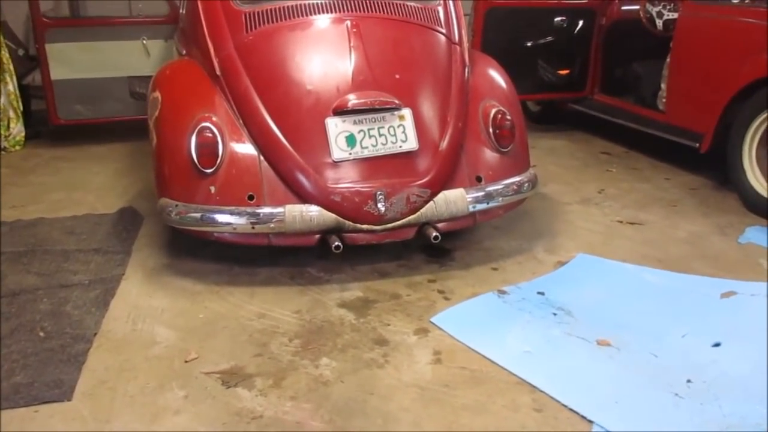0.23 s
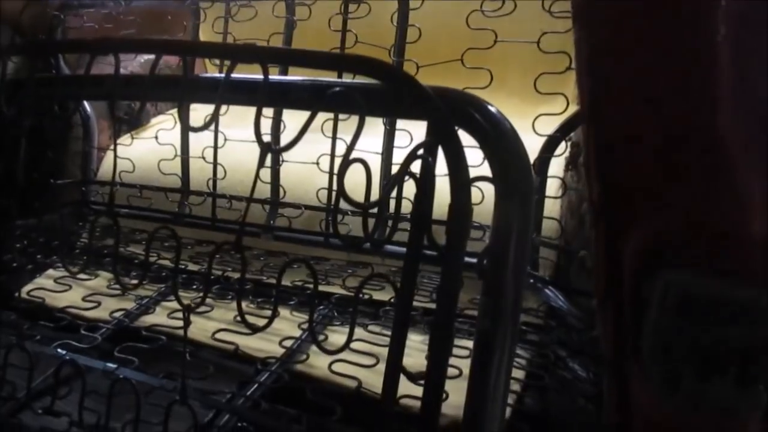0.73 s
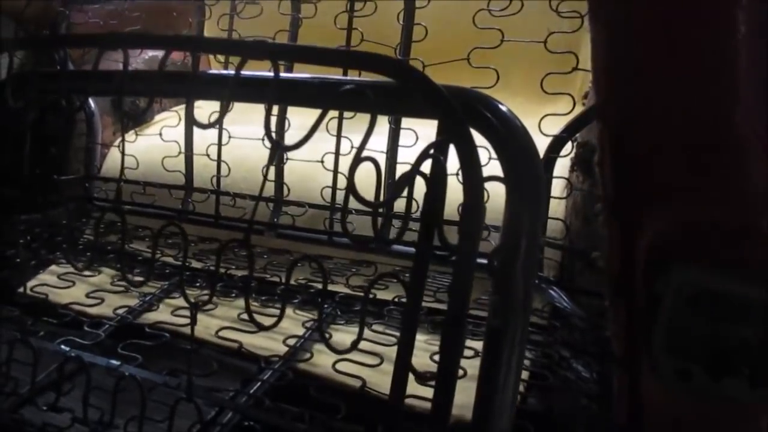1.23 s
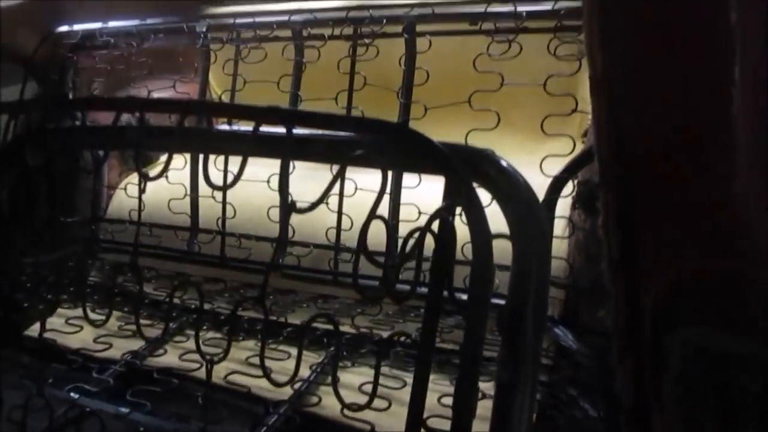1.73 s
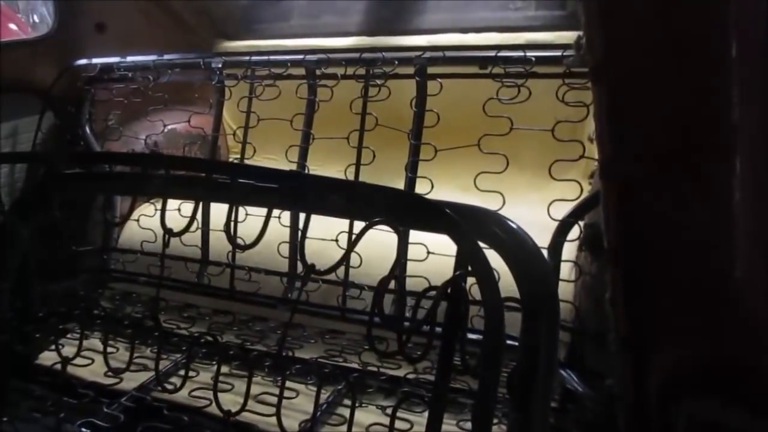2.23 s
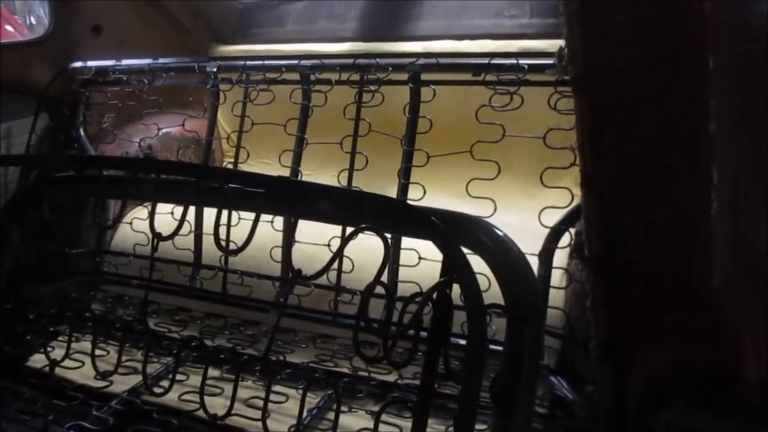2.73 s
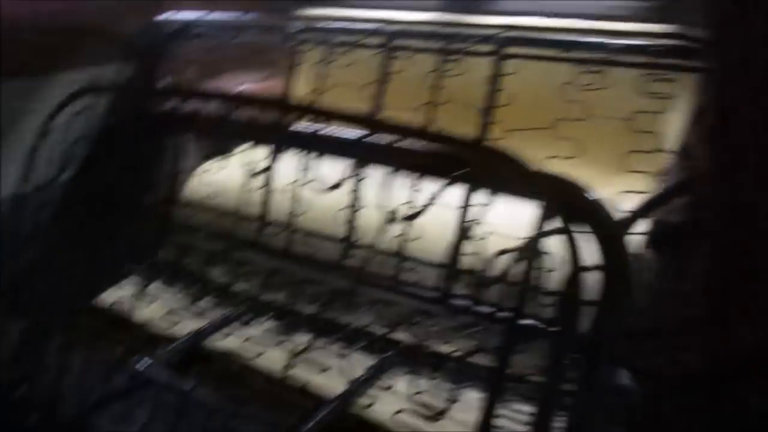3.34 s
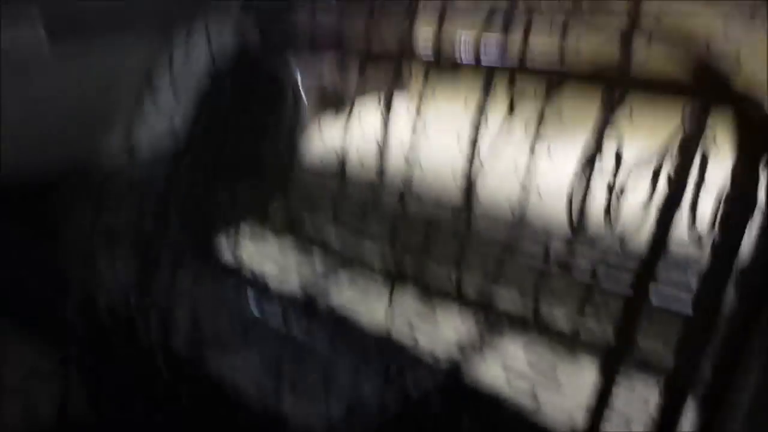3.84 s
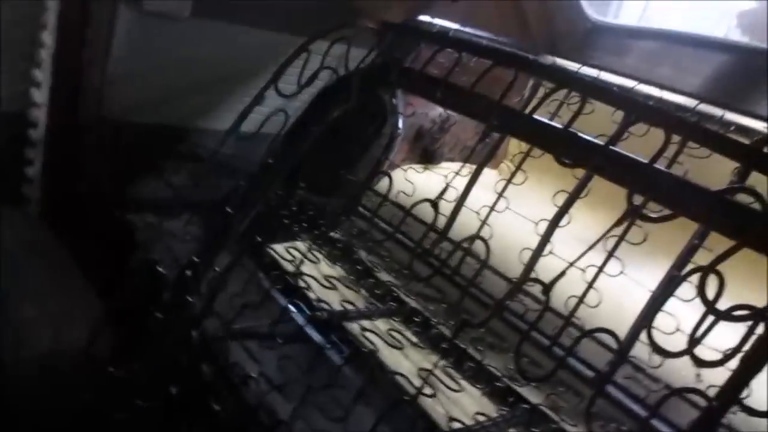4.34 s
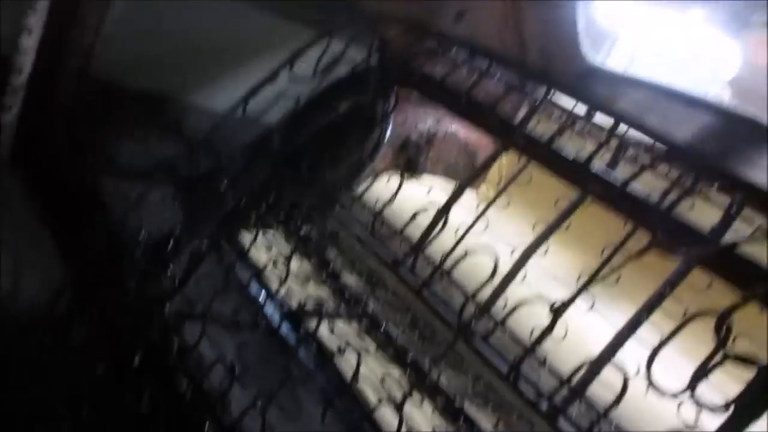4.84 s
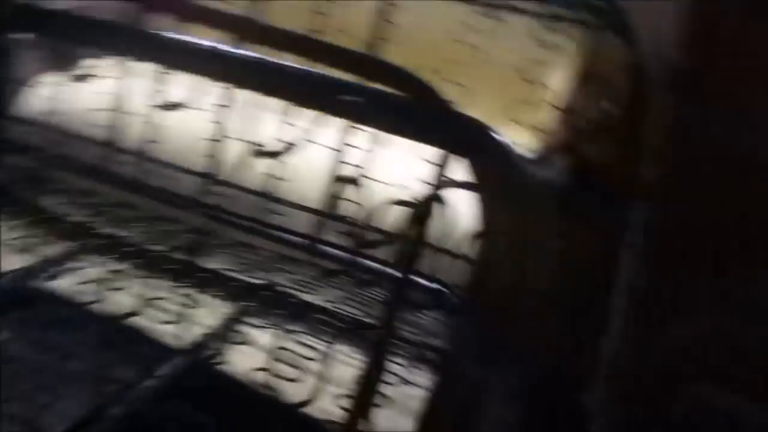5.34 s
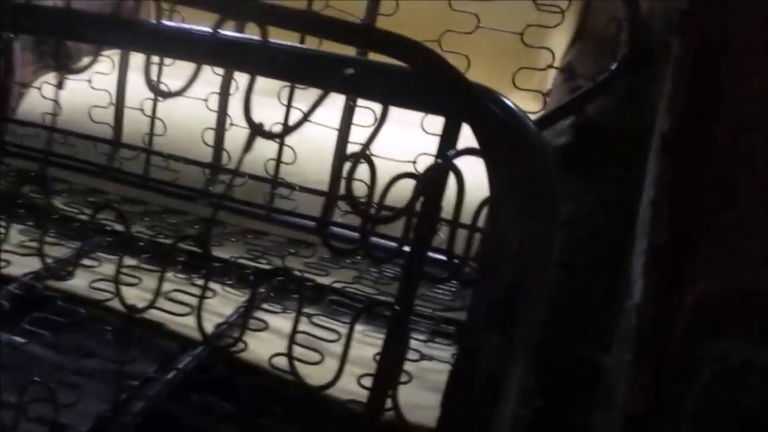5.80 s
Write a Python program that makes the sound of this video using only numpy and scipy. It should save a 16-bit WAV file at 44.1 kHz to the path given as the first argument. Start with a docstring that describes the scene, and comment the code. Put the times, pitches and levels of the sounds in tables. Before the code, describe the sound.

An air-cooled four-cylinder engine idles unevenly with fan rush, heard inside a bare car, then loses ignition and chugs down amid handling bumps.

```python
"""An air-cooled flat-four idles in a garage: a moment behind the tailpipes, silence, then inside the bare cabin.
Four uneven cylinders drone in tuned harmonics and rasp in echoed pulses, under a cooling fan of shaped noise.
The ignition goes off; gliding harmonics pump air and short resonances shudder as the engine runs down.
The hand that holds the microphone clicks and rustles in noise bursts, over a faint hiss and whine."""
import sys
import numpy as np
from scipy import signal
from scipy.fft import rfft, irfft, next_fast_len
from scipy.io import wavfile
from scipy.ndimage import uniform_filter1d

SR = 44100
rng = np.random.default_rng(int(sys.argv[2]) if len(sys.argv) > 2 else 0)


def to_wav(sig):
    """Store sig (one row per channel, or 1-D mono) as 16-bit WAV at the path in sys.argv[1].

    Samples outside -1..1 are clipped; the rate is SR.
    """
    pcm = np.clip(np.atleast_2d(sig), -1, 1) * 32767
    pcm = np.round(pcm).astype(np.int16)
    wavfile.write(sys.argv[1], SR, pcm.T)  # frames by channels


N = 267642
T = np.arange(N) / SR

# reference firing rate at idle (firings per second, four to a cycle)
IDLE_HZ = 49.955
# The four cylinders in firing order. Each row: strength in dB, lateness in firing intervals.
CYLINDERS = [(-3, -0.0016), (0, 0.0256), (-1, 0.0798), (-1, -0.0517)]


def undb(db):
    """Decibels to gain."""
    return 10 ** (np.asarray(db) / 20)


def curve(rows):
    """Join rows of (seconds, value) by straight lines in time."""
    return np.interp(T, *np.transpose(rows))


def unit(x):
    """Scale to rms 1."""
    return x / np.sqrt(np.mean(x ** 2))


def steady(x, size=11000):
    """Even out the level to about rms 1 over every quarter second."""
    local_power = uniform_filter1d(x ** 2, size)
    return x / np.sqrt(local_power + 1e-4 * np.mean(x ** 2))


def walk(rate):
    """Smooth random wander of rms 1, from noise steps at the given rate in Hz."""
    k = int(SR / rate)
    steps = np.repeat(rng.standard_normal(4096), k)[:N]
    return unit(uniform_filter1d(uniform_filter1d(steps, k), k))


def colour(x, points):
    """Shape a sound with a spectrum of (Hz, dB) points; it falls off below the first."""
    hz, db = np.transpose(points)
    size = next_fast_len(N + 8192)
    f = np.maximum(np.fft.rfftfreq(size, 1 / SR), 1)
    gain = undb(np.interp(np.log(f), np.log(hz), db)) * np.minimum(f / hz[0], 1) ** 2
    return irfft(rfft(x, size) * gain, size)[:N]


def ring(x, modes):
    """Send a sound through parallel resonances of (Hz, width in Hz, dB)."""
    out = 0
    for hz, width, db in modes:
        b, a = signal.iirpeak(hz, hz / width, fs=SR)
        out = out + undb(db) * signal.lfilter(b, a, x)
    return out


def echoes(x, tail_s):
    """Dense noise-like reflections that die away."""
    t = T[:SR // 3]
    return signal.fftconvolve(x, rng.standard_normal(len(t)) * np.exp(-t / tail_s))[:N]


def strokes(events, modes, contact_s=0.00045):
    """Single sharp blows of (seconds, peak dB) into a set of resonances, passed twice."""
    size = 2048
    out = np.zeros(N + size)
    for s, db in events:
        push = np.exp(-T[:size] / contact_s) * rng.standard_normal(size)
        blow = ring(ring(push, modes), modes)
        at = int(np.clip(s * SR, 0, N))
        out[at:at + size] += undb(db) * blow / np.abs(blow).max()
    return out[:N]


def throb(since_s, hz, half_s, lag=0):
    """A resonance that swells and fades within a few waves."""
    return np.exp(-.5 * (since_s / half_s) ** 2) * np.cos(2 * np.pi * hz * since_s + lag)


def drone(phase, orders, lead, trail=.34, waver_db=0.97, lope=0.12):
    """Exhaust tones: multiples of four come from even firing, the rest from unevenness between cylinders."""
    # the upper resonance: each throb differs in strength (share) and lag (radians)
    strength_spread, lag_spread = .09, .2
    # its throb is drawn out: lag in radians grows away from a centre (multiple of the cycle rate)
    smear, centre = .075, 21.7
    low, high = 0, 0
    swell = 1 + lope * walk(21.77)
    for k, db in orders:
        upper = k > 16
        angle = np.pi / 2 * k * (phase + lead)
        if k % 4 == 0:
            tone = -undb(db + waver_db * walk(10)) * np.exp(1j * angle)
        else:
            # the uneven throb trails the firing; the upper resonance turns it a quarter wave
            tone = undb(db) * swell * np.exp(1j * (angle - np.pi / 2 * (k * trail - upper)))
        if upper:
            high = high + tone * np.exp(1j * smear * (k - centre) ** 2)
        else:
            low = low + tone
    uneven = (1 + strength_spread * walk(30)) * np.exp(1j * lag_spread * walk(25))
    return unit(np.real(low + high * uneven))


def firings(phase, scatter_db=1.5, jitter_s=0.00018):
    """One pulse train per cylinder; every firing has its own strength and timing."""
    number = np.arange(1, int(phase[-1]))
    chance = rng.standard_normal((400, 2))[number]
    db, late = np.array(CYLINDERS)[number % 4].T
    at = (np.interp(number + late, phase, T) + jitter_s * chance[:, 0]) * SR
    trains = np.zeros((4, N))
    trains[number % 4, np.clip(at.astype(int), 0, N - 1)] = undb(db + scatter_db * chance[:, 1])
    return trains


def rasp(phase, spectrum, pipe_db, tail_s=0.052, gas_db=-4, puff=4.3, pipe_gas_db=-5, swell_db=-0.06):
    """Each cylinder rattles its own path through the silencer, and a puff of gas follows."""
    # Ringing of the tailpipes. Each row: Hz, width in Hz, level in dB.
    pipe_modes = [(667, 10, -8), (692.6, 13, 4.5), (769.7, 16, 9.5), (931, 13, 3), (1072, 3.7, -7),
                  (1141, 3.4, 8)]
    trains = firings(phase)
    clatter = unit(sum(echoes(train, tail_s) for train in trains))
    strength = undb(np.array(CYLINDERS)[phase.astype(int) % 4, 0])
    # the puff dies away in firing intervals
    gas = unit(rng.standard_normal(N) * strength * np.exp(-(phase % 1) / puff))
    flow = clatter + undb(gas_db) * gas
    # one cylinder and the gas set the tailpipes ringing
    pipes = ring(unit(trains[0]) + undb(pipe_gas_db) * gas, pipe_modes)
    pipes = signal.sosfilt(signal.butter(4, 1500, fs=SR, output="sos"), pipes)
    swell = undb(swell_db * np.cos(np.pi / 2 * (phase - .3)))  # once a cycle
    return steady(swell * (unit(colour(flow, spectrum)) + undb(pipe_db) * unit(pipes)))


def barks(phase, rate):
    """Slugs of gas sound the tailpipes at set places in every cycle; the pitches stay as the engine slows."""
    # Each row: place in firing intervals, Hz, half length in seconds, typical peak in dB.
    bark_rows = [(.42, 645, .0028, -32), (.7, 787, .0052, -26), (1.285, 780, .006, -33),
                 (1.52, 1030, .0022, -34), (1.56, 660, .003, -35), (2.55, 430, .0055, -35),
                 (2.91, 775, .009, -32.5), (3.137, 425, .005, -36), (3.62, 680, .0055, -33),
                 (3.72, 1035, .0022, -35)]
    scatter_db, stagger = 2.2, .42  # strength in dB and lag in radians vary from bark to bark
    out = 0
    for place, hz, half_s, db in bark_rows:
        cycle, within = np.divmod(phase - place + 2, 4)
        strength, lag = rng.standard_normal((200, 2))[cycle.astype(int)].T
        since_s = (within - 2) / rate
        out = out + undb(db + scatter_db * strength) * throb(since_s, hz, half_s, stagger * lag)
    return out


def pops():
    """Harder slugs of gas pop in the tailpipes, as short pushes into resonances."""
    # Each row: time in seconds, peak in dB.
    pop_times = [(1.617, -19), (1.733, -23), (2.030, -21), (2.111, -19), (2.932, -17), (2.991, -20),
                 (4.208, -17.5), (5.409, -27)]
    # Ringing of a pop. Each row: Hz, width in Hz for one pass, level in dB.
    pop_modes = [(563, 200, 5), (797, 110, 5.5), (1030, 140, -2.5)]
    return strokes(pop_times, pop_modes)


def fan(phase, spectrum, bright_db, chatter_db=-3.0, chatter_s=0.0022, tin_db=-24, flutter_db=0.74,
        panel_db=-12.5, panel_s=0.0071):
    """Cooling air rushes through the tinware while the valve gear chatters unevenly."""
    # Ringing of the cooling tinware. Each row: Hz, width in Hz for one pass, level in dB.
    tin_modes = [(3266, 220, -4), (3968, 160, -2), (5155, 120, -5), (6140, 350, -6), (8340, 600, -5)]
    # eight small contacts to a firing interval, each with its own force
    contacts = np.diff(np.floor(8 * phase + .3 * walk(300)), prepend=0) > 0
    forces = contacts * undb(2.2 * rng.standard_normal(N))
    ticks = signal.lfilter([1], [1, -np.exp(-1 / (chatter_s * SR))], forces)
    air = rng.standard_normal(N) * undb(flutter_db * walk(24.17))
    drive = air + undb(chatter_db) * unit(ticks * rng.standard_normal(N))
    # nearby panels colour the rush
    drive = unit(drive) + undb(panel_db) * unit(echoes(drive, panel_s))
    tin = unit(ring(ring(drive, tin_modes), tin_modes))
    rush = unit(colour(drive, spectrum)) + undb(tin_db) * tin
    # the top of the rush has its own level
    top = signal.sosfiltfilt(signal.butter(2, 3800, "high", fs=SR, output="sos"), rush)
    return unit(rush + top * (undb(bright_db) - 1))


def pumping(phase, pace, unfired, hum_db=-24.0, rumble_db=-36, shudder_db=-26.0, shudder_power=2.7,
            garage_s=0.11, churn_db=-1, lump_db=2.5):
    """Unfired pistons push air: harmonics glide through the cabin's boom, and the garage rings and rumbles."""
    # Air pulses of the unfired pistons. Each row: multiple of the firing rate, level in dB.
    pulse_orders = [(1, 0), (2, -1.5), (3, -6), (4, -21), (5, -13), (6, -14), (7, -17), (8, -15), (9, -14),
                    (10, -14), (11, -16)]
    # Level of the air pulses during the run-down. Each row: time in seconds, dB.
    pulse_level = [(4.68, 0), (4.76, 3), (4.9, -5), (5.07, -2), (5.14, 0), (5.3, -2), (5.43, -1.5),
                   (5.56, 1), (5.61, -8), (5.76, -7), (5.84, 2), (5.92, -7)]
    # How the cabin passes the air pulses. Each row: Hz, dB.
    boom_hz, boom_gain_db = np.transpose([(18, -17), (30, -11), (36, -14), (40, -5), (43, 0), (51, 0),
                                          (57, -8), (68, -16), (80, -11), (95, -10), (112, -14), (130, -6),
                                          (150, -6), (170, -19), (230, -14), (320, -24)])
    # Standing waves of the garage. Each row: Hz, width in Hz, dB.
    garage_modes = [(139, 4, -3), (152.6, 3, 6), (165, 3.3, 7)]
    # Body shell, silencer and cabin resonances. Each row: Hz, width in Hz, dB.
    body_modes = [(46, 24, 8.5), (88, 260, -3), (138.4, 12, -4), (260, 24, -5.5), (273, 16, -7),
                  (356, 32, -5)]
    hum = 0
    for k, pulse_db in pulse_orders:
        boom_db = np.interp(k * IDLE_HZ * pace, boom_hz, boom_gain_db)
        level = undb(pulse_db + boom_db + lump_db * walk(6.6))
        hum = hum - level * np.cos(2 * np.pi * k * (phase + .5))
    hum = unfired * undb(curve(pulse_level)) * hum
    wash = unit(sum(echoes(train, garage_s) for train in firings(phase)))
    wash = wash + undb(churn_db) * rng.standard_normal(N)
    rumble = colour(ring(wash, body_modes),
                    [(35, -9), (60, -10), (110, 3), (350, -7.0), (700, -7.5), (2000, -20.5)])
    # the body shudders when the firing stops, and settles as the speed falls
    shudder = undb(shudder_db) * unfired * pace ** shudder_power
    return (undb(rumble_db) + shudder) * steady(rumble) + undb(hum_db) * (hum + ring(hum, garage_modes))


def in_cabin(dulling=0.49, lurch=.035, bark_db=-0.3, bark_power=1.0):
    """The drone lasts as long as combustion; rasp and fan sink with engine speed, and the fan grows duller."""
    # The idle hunts a little. Each row: time in seconds, firings per second.
    idle_rate = [(1.1, 49.98), (1.5, 50.26), (2.0, 49.77), (2.35, 49.42), (2.8, 50.42), (3.2, 49.92),
                 (3.62, 49.6), (4.0, 50.33), (4.5, 49.93), (4.65, 49.45)]
    # The engine runs down. Each row: time in seconds, firings per second.
    coast_rate = [(4.72, 47.3), (4.79, 43.5), (4.86, 39), (5.0, 33.5), (5.18, 28), (5.3, 24.7),
                  (5.45, 21.6), (5.55, 19.7), (5.75, 16.4), (5.85, 14.4), (6.07, 10.5)]
    # Exhaust drone. Each row: multiple of the cycle rate, relative level in dB.
    cabin_orders = [(2, -38), (3, -20), (4, -3.4), (5, -31), (6, -26), (7, -23), (8, -12.3), (9, -21.5),
                    (10, -13.8), (11, -23), (12, -1.3), (13, -22), (14, -13.5), (15, -21), (16, -32),
                    (17, -20), (18, -18), (19, -32), (20, -10.5), (21, -15), (22, -6.8), (23, -15),
                    (24, -28), (25, -25), (26, -25), (27, -23), (28, -29), (29, -28)]
    # Spectrum of the exhaust rasp. Each row: Hz, relative dB per Hz.
    rasp_spectrum = [(150, 9), (220, 5.5), (300, 0), (400, 1.5), (590, -3), (700, 1), (900, -1),
                     (1100, -2.5), (1250, -41), (1700, -16), (3000, -46)]
    # Spectrum of the fan. Each row: Hz, relative dB per Hz.
    fan_spectrum = [(900, -10), (1250, -9.5), (1600, -13.5), (2400, -15.5), (3000, -17.5), (4200, -22),
                    (5400, -24.5), (7000, -25.5), (8500, -26.5), (11500, -32), (13500, -43), (15500, -64)]
    # Treble of the fan, before dulling. Each row: time in seconds, dB.
    treble = [(.6, -1), (1.6, -0.1), (2.5, 0), (3.2, -1), (3.6, -0.5), (4.3, -2.5), (4.8, -3.5)]
    # The mechanical wash swells unevenly. Each row: time in seconds, dB.
    wash_level = [(.6, 1), (1.45, -0.5), (1.7, -0.5), (1.85, 0), (2.0, 0.5), (2.5, -.5), (2.82, 0.8),
                  (3.2, 0.4), (3.5, -1.1), (3.9, 0.5), (4.1, 1.6), (4.5, 0.3), (4.9, 0), (5.6, -1)]
    # Exhaust rasp and fan as the microphone moves about the cabin. Each row: time in seconds, dB.
    nearness = [(.6, 0), (3.25, 1), (3.45, 0.4), (3.8, -1.1), (4.1, -1.3), (4.65, -0.3)]
    drone_db, rasp_db, fan_db = -20, -29, -38.5  # base levels at idle
    rasp_power, fan_power = 1, 1.08  # how strongly each follows the engine speed
    ignition_off_s, burn_fade_db_per_s = 4.66, 59  # the last combustions die away

    burn = undb(-burn_fade_db_per_s * np.maximum(T - ignition_off_s, 0))
    rate = curve(idle_rate + coast_rate)
    pace = rate / IDLE_HZ
    phase = np.cumsum(rate) / SR + 2.13  # in firing intervals
    # as it slows the crank lurches from one compression to the next
    phase = phase + lurch * (1 - pace) * walk(12)
    tones = undb(drone_db) * burn * drone(phase, cabin_orders, lead=.5, trail=.34)
    exhaust = undb(rasp_db) * pace ** rasp_power * rasp(phase, rasp_spectrum, pipe_db=-9.5)
    exhaust = exhaust + undb(bark_db) * pace ** bark_power * barks(phase, rate)
    bright_db = curve(treble) + dulling * 20 * np.log10(pace)
    cooling = undb(fan_db + curve(wash_level)) * pace ** fan_power * fan(phase, fan_spectrum, bright_db)
    near = undb(curve(nearness)) * (exhaust + cooling)
    return tones + pumping(phase, pace, 1 - burn) + near + pops()


def behind_car(drone_db=-23.0, rasp_db=-33, fan_db=-35):
    """Close to the tailpipes the idle is brighter and less boomy."""
    # Exhaust drone. Each row: multiple of the cycle rate, relative level in dB.
    rear_orders = [(4, -9), (6, -5), (8, -1), (10, -3), (12, 0), (14, -1), (16, -9), (18, -5), (20, -4),
                   (22, -3), (23, -9), (28, -13)]
    # Spectrum of the exhaust rasp. Each row: Hz, relative dB per Hz.
    rasp_spectrum = [(150, 3), (280, 7), (380, -4), (500, 1.5), (620, 3), (730, -1.5), (860, -9),
                     (1100, -2), (1250, -18.5), (1700, -26.5), (3000, -33.5)]
    # Spectrum of the fan. Each row: Hz, relative dB per Hz.
    fan_spectrum = [(900, 2.5), (1400, -10), (3000, -11.5), (5200, -18.5), (7900, -14.5), (10000, -18.5),
                    (12000, -26), (15500, -44.5)]
    phase = 48.0 * T + 3.4  # 48 firings per second
    tones = undb(drone_db) * drone(phase, rear_orders, lead=0, trail=.5)
    exhaust = tones + undb(rasp_db) * rasp(phase, rasp_spectrum, pipe_db=-25.0)
    return exhaust + undb(fan_db) * fan(phase, fan_spectrum, bright_db=0.0)


def shudders():
    """The slowing engine rocks on its mounts and sets the body booming."""
    # Each row: time in seconds, Hz, half length in seconds, peak in dB.
    shudder_rows = [(4.77, 138, 0.016, -22.5), (4.86, 133, 0.019, -26), (5.066, 136, 0.021, -24),
                    (5.122, 145, 0.012, -24), (5.195, 148, .014, -27), (5.281, 134, .018, -29),
                    (5.475, 129, 0.016, -29), (5.634, 140, .013, -27), (5.786, 135, .018, -33.5),
                    (5.895, 161, .02, -29), (6.04, 130, 0.02, -32.5)]
    out = 0
    for s, hz, half_s, db in shudder_rows:
        out = out + undb(db) * throb(T - s, hz, half_s, rng.uniform(0, 2 * np.pi))
    return out


def noise_bursts(events, spectrum, grain_db=0):
    """Short bursts of contact noise that swell and die away; rubbing catches in small grains."""
    envelope = 0
    for s, db, rise, decay in events:
        envelope = envelope + undb(db) * np.exp(-np.maximum((s - T) / rise, (T - s) / decay))
    grains = rng.standard_normal(N) * undb(grain_db * walk(600))
    return envelope * unit(colour(grains, spectrum))


def rattles():
    """The tinware rattles now and then, as grainy bursts of noise."""
    # Each row: time in seconds, level in dB, rise in seconds, decay in seconds.
    rattle_times = [(1.69, -44, .04, .035), (1.975, -43, .03, 0.028), (2.81, -44, .04, .04),
                    (4.09, -45.5, 0.044, .05)]
    # Each row: Hz, relative dB per Hz.
    rattle_spectrum = [(1200, -6), (1900, -7), (3300, 0), (6000, -10), (12000, -30)]
    return noise_bursts(rattle_times, rattle_spectrum, grain_db=3)


def hand_on_microphone():
    """The holding hand clicks, rustles and knocks in noise bursts; small hard taps ring bare metal."""
    # Clicks, rustles, soft knocks. Each row: time in seconds, level in dB, rise and decay in seconds.
    click_times = [(3.596, -22, 0.00066, 0.00074), (5.615, -47, .0005, .002), (5.744, -45.5, 0.0005, 0.002)]
    rustle_times = [(3.26, -40.5, 0.041, 0.015), (3.283, -40, .003, .004), (4.648, -38, 0.0038, 0.011),
                    (5.33, -52, 0.0065, .012), (5.435, -52, .005, .01), (5.51, -52.5, 0.02, 0.044),
                    (5.613, -48, 0.0057, 0.0083), (5.66, -52, 0.0071, 0.017), (5.703, -60, .003, .008),
                    (5.75, -48, 0.005, 0.04), (5.895, -62.5, 0.0084, 0.012)]
    knock_times = [(3.598, -40, 0.002, 0.008), (3.735, -34, .003, .009), (4.985, -26, 0.0099, 0.037),
                   (5.505, -32.5, 0.012, 0.043), (5.62, -35, 0.021, 0.026), (5.765, -33.5, 0.021, 0.02),
                   (5.94, -30, 0.011, 0.1)]
    # Their spectra. Each row: Hz, relative dB per Hz.
    click_spectrum = [(600, -16), (1700, 0), (4000, -2), (5500, -8), (7800, 1), (10000, -10), (15000, -24)]
    rustle_spectrum = [(1000, -6), (3000, 4), (6000, -0.5), (8800, 5), (11000, -4), (15500, -21)]
    knock_spectrum = [(100, 16.5), (220, 21), (400, 8), (1400, -8.5), (3000, -19), (8000, -58)]
    # Taps on bare metal. Each row: time in seconds, peak in dB.
    tap_times = [(3.599, -21), (3.735, -24.5)]
    # Ringing of a tap. Each row: Hz, width in Hz for one pass, level in dB.
    tap_modes = [(1350, 250, 0), (1950, 260, 5), (2800, 600, 2), (3900, 900, 0), (4900, 880, -6)]
    clicks = noise_bursts(click_times, click_spectrum)
    rustles = noise_bursts(rustle_times, rustle_spectrum, grain_db=2)
    knocks = noise_bursts(knock_times, knock_spectrum)
    return clicks + rustles + knocks + strokes(tap_times, tap_modes)


def background(hiss_db=-62, whine_db=-80.5):
    """A faint steady hiss of shaped noise and a thin high sine whine lie under the engine."""
    # Spectrum of the hiss. Each row: Hz, relative dB per Hz.
    hiss_spectrum = [(1000, -10), (4000, -1), (9000, 0), (10300, -1), (11000, -12), (12500, -18),
                     (15500, -26)]
    hiss = unit(colour(rng.standard_normal(N), hiss_spectrum))
    whine = np.sin(2 * np.pi * 11795 * T)
    return undb(hiss_db) * hiss + undb(whine_db) * whine


def between(start_s, end_s, fade_s=.003):
    """On between two cuts, with a very short fade at each."""
    return np.clip(np.minimum(T - start_s, end_s - T) / fade_s, 0, 1)


def scene():
    """Two microphone positions with silence between them."""
    rear_end_s, cabin_start_s = .189, .5645
    cabin = in_cabin() + shudders() + rattles() + hand_on_microphone() + background()
    rear = behind_car() * between(0, rear_end_s)
    return (rear + cabin * between(cabin_start_s, T[-1]))[None]


def record(dry):
    """The recorder cuts the top, with a steep low-pass at 15.4 kHz."""
    return signal.sosfilt(signal.ellip(10, .1, 80, 15400, fs=SR, output="sos"), dry)


dry = scene()
out = record(dry)
to_wav(out)
```